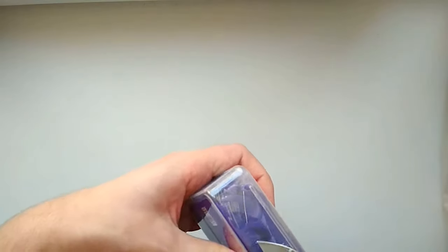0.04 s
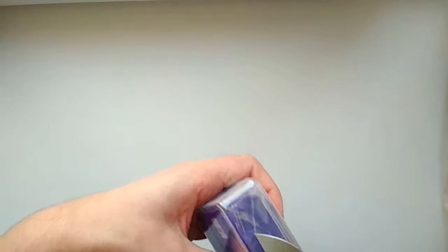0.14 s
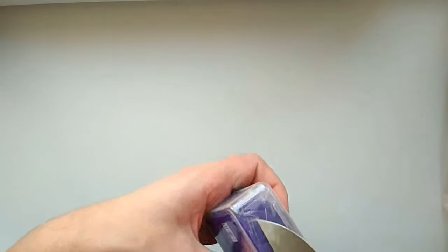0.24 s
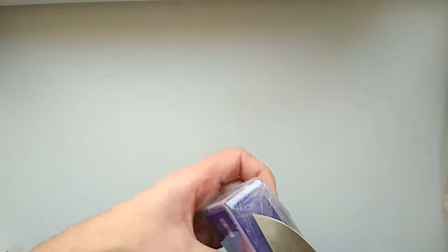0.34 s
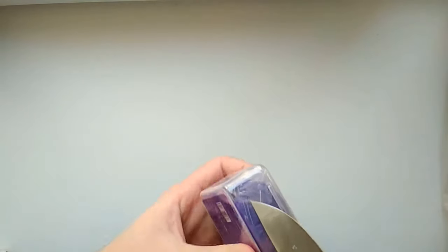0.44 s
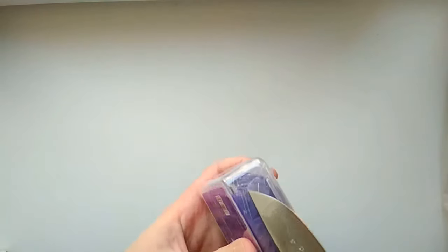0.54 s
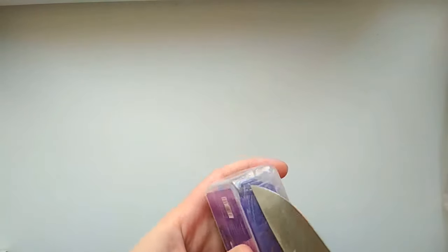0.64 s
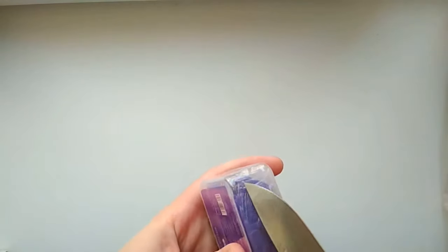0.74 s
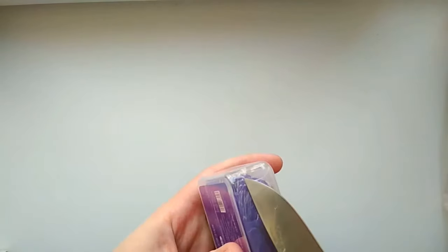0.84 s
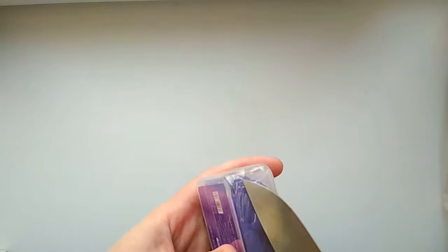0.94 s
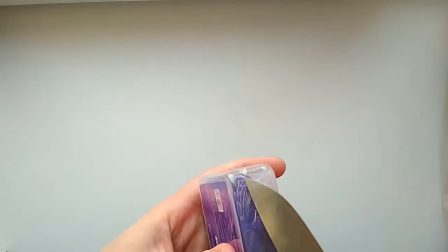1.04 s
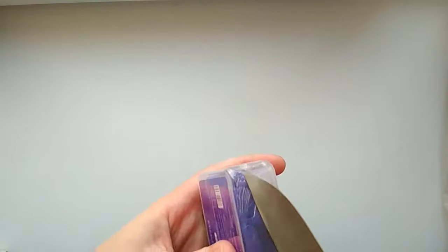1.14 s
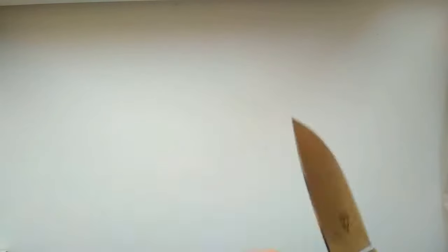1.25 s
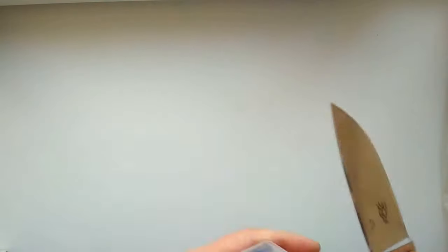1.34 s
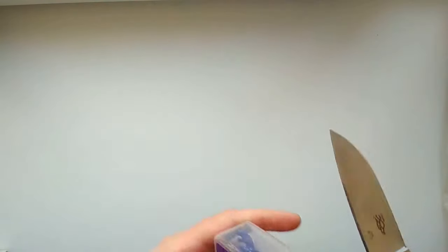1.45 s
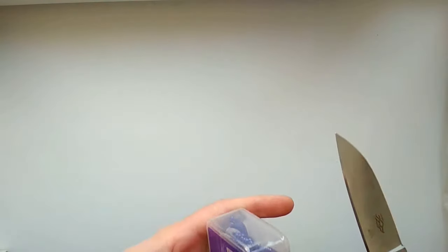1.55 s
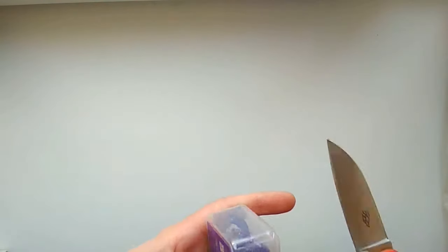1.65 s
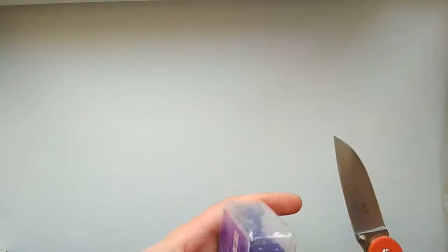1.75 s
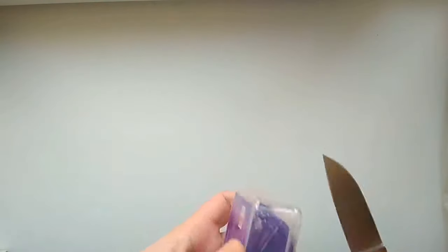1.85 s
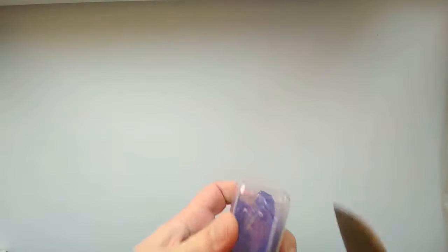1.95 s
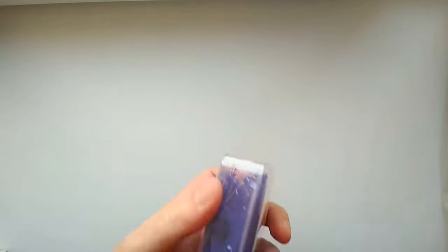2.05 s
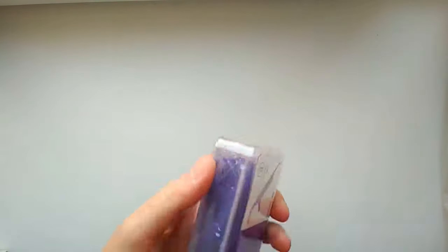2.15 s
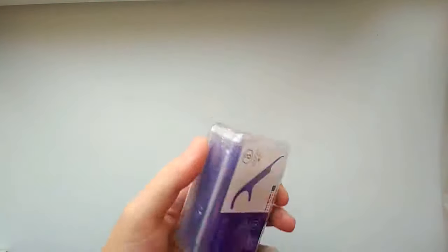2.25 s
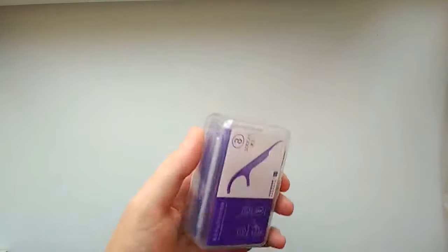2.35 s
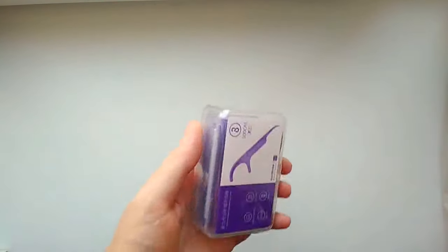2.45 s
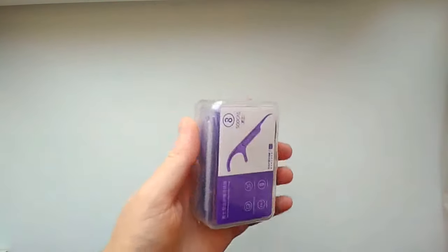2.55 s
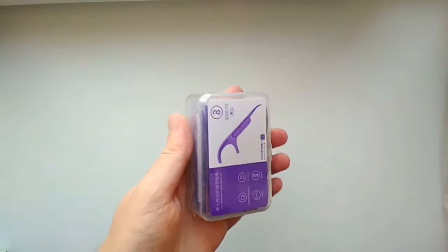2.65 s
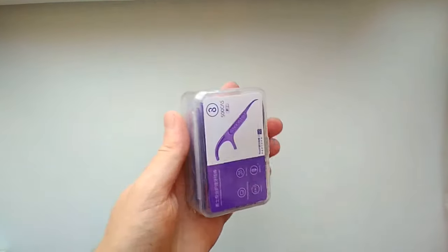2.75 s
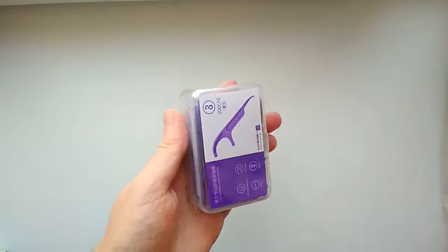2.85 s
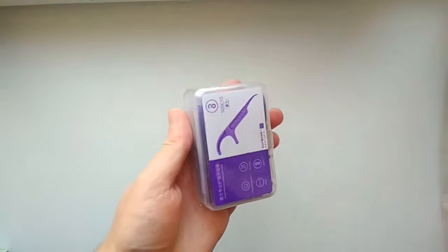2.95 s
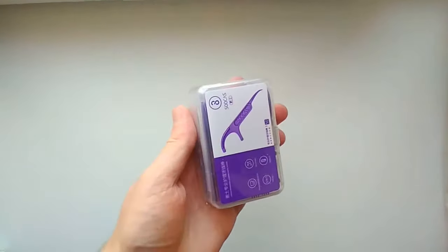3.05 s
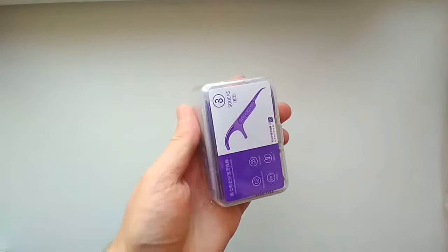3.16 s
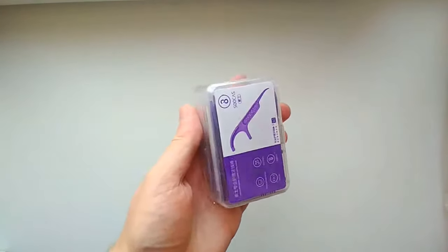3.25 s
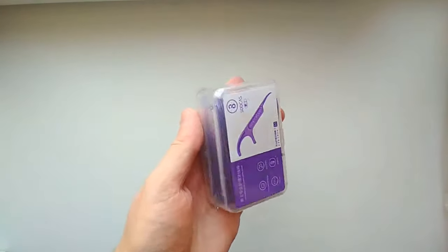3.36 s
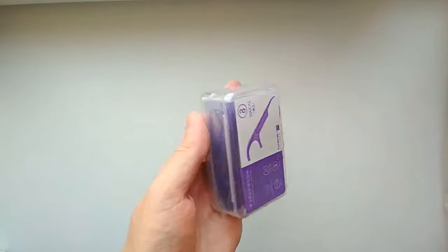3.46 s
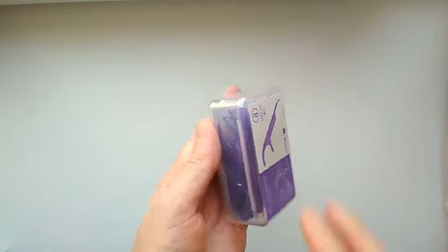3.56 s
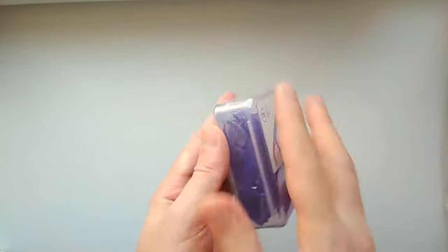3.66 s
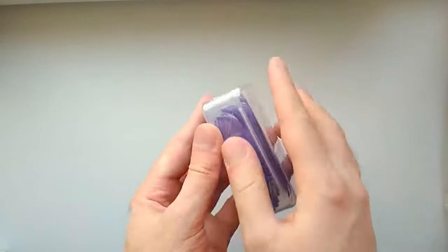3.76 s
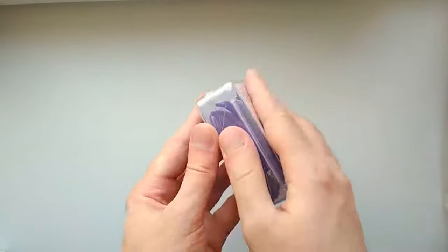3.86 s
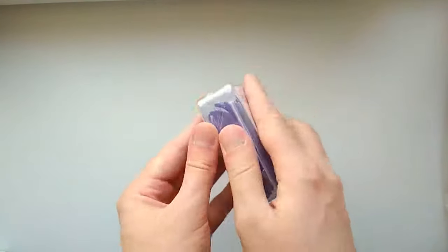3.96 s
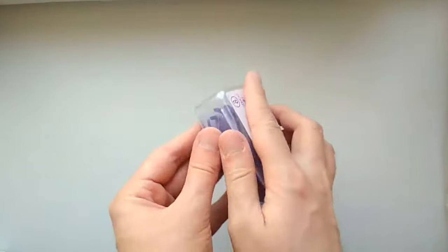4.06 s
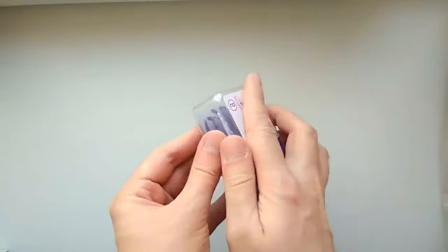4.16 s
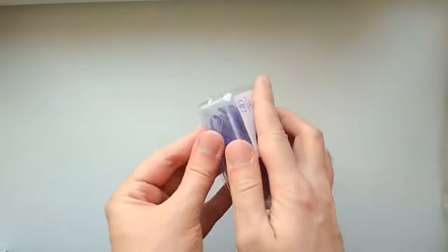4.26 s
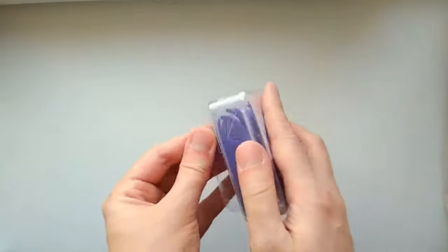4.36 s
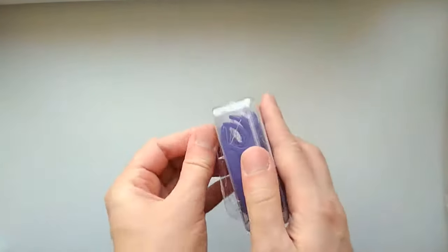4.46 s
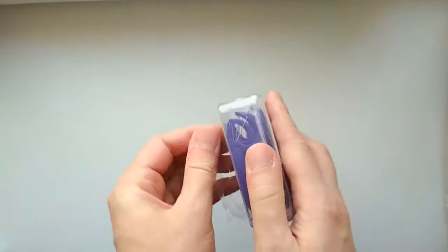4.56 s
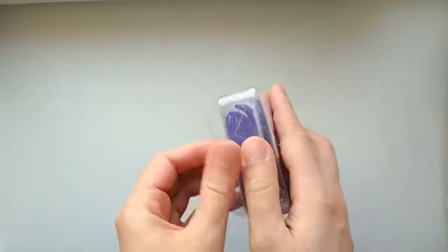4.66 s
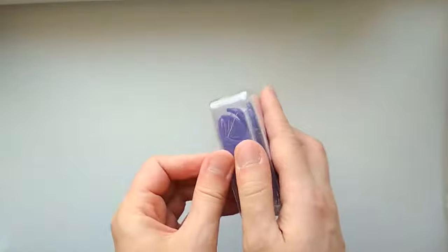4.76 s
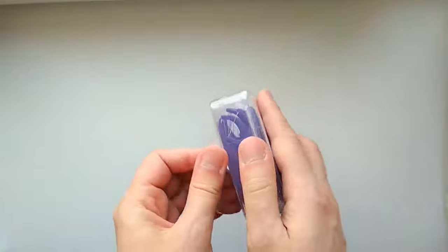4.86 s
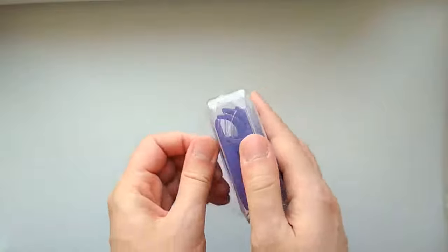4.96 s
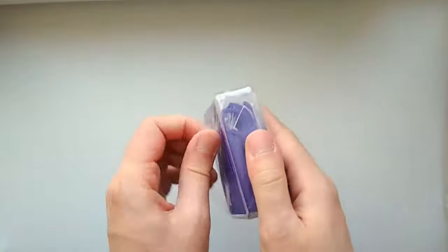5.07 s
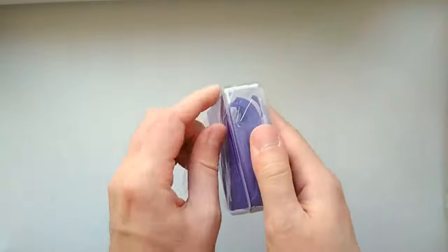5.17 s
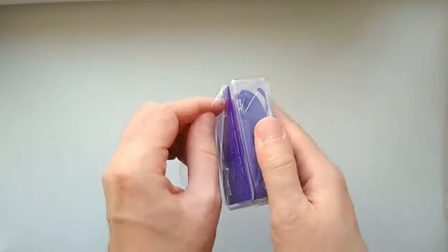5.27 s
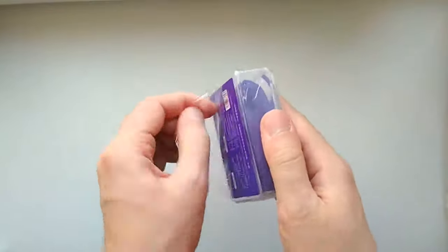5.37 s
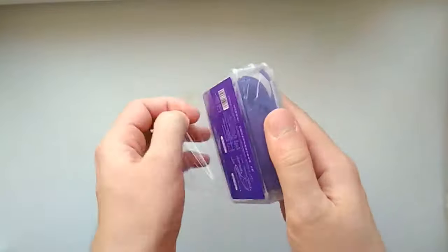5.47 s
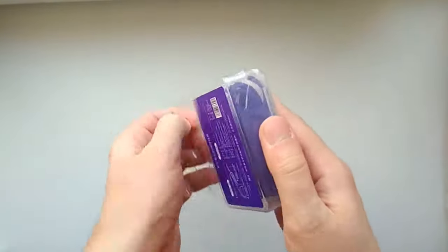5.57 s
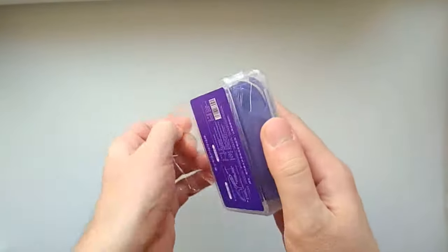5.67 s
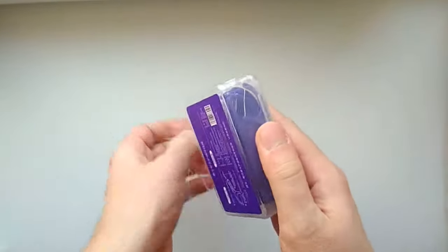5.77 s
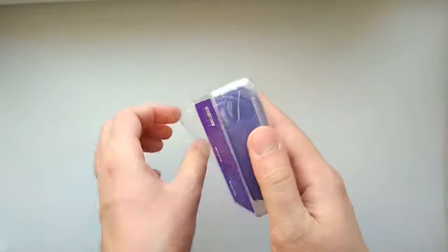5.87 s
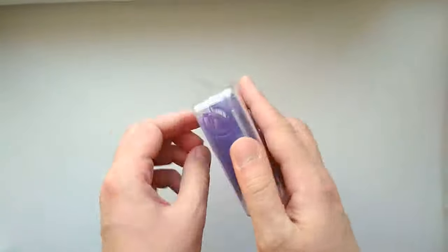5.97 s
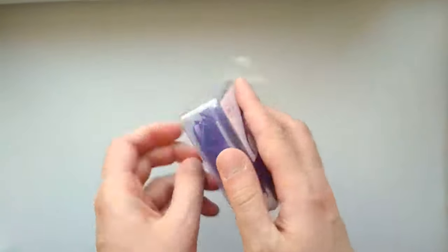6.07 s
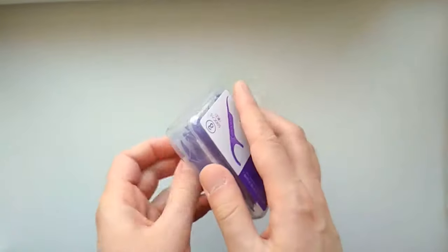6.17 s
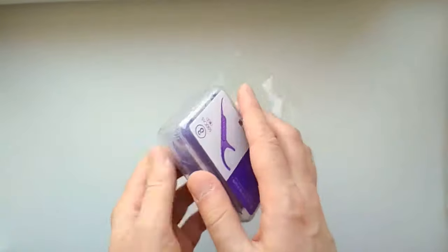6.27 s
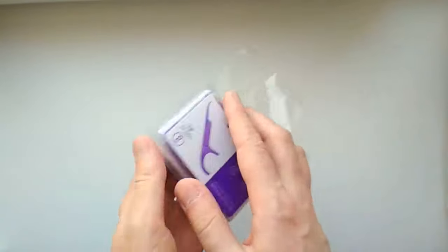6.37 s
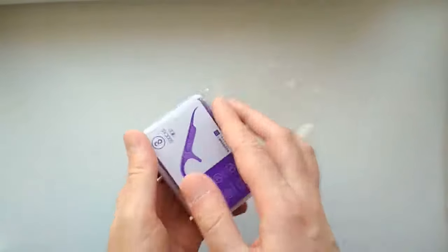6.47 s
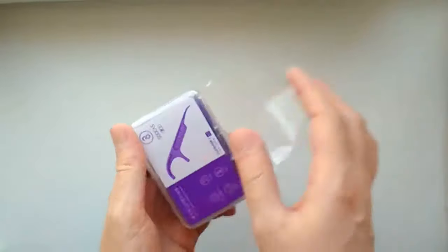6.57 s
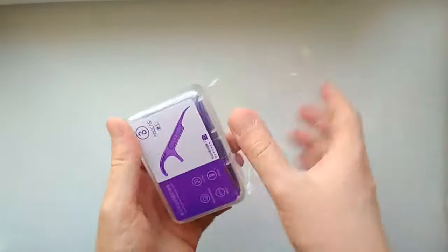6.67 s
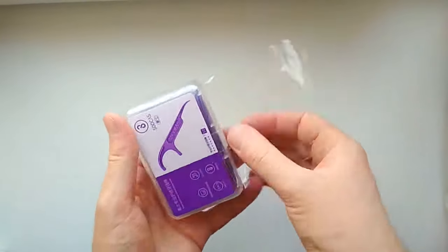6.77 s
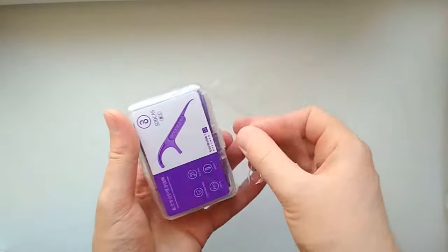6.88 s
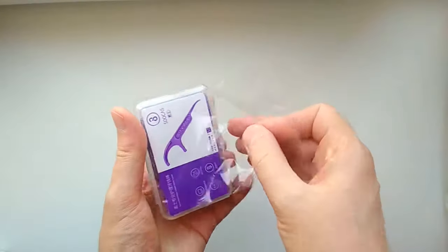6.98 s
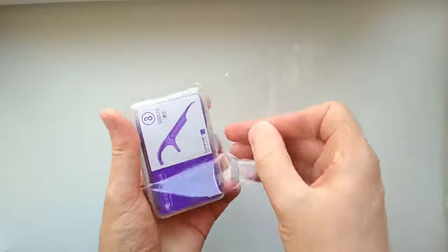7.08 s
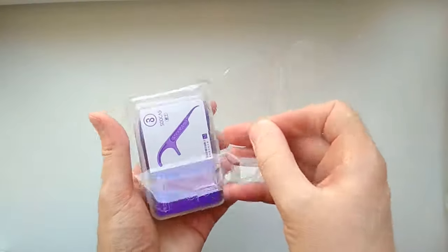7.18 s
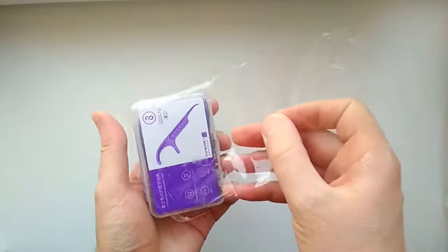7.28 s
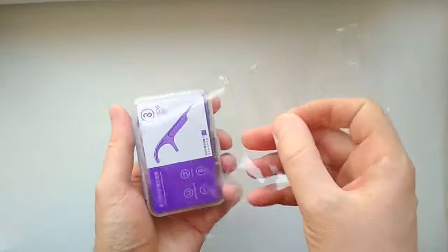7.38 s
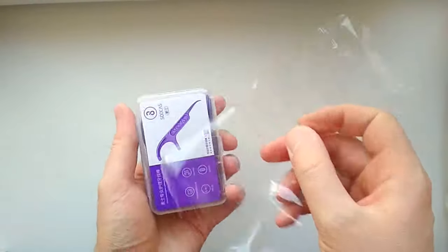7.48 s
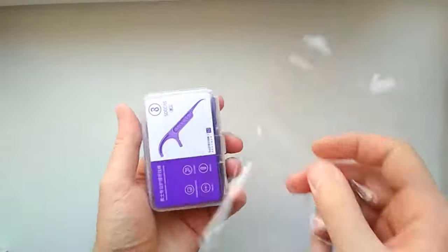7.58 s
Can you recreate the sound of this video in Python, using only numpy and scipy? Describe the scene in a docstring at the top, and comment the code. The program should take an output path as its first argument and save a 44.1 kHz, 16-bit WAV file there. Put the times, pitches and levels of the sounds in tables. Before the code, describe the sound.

A knife pierces plastic film on a small case, which clatters; the knife is set down, then fingers crackle and peel the wrapping away.

```python
"""Thin film wrapped round a small plastic case, slit by a knife, then picked and peeled by fingers, close by.
Film: buckle noise, cracking facets and treble fold resonances, with taps on the hollow case underneath.
The blade slips off and the case clatters (ringing bursts); the knife is laid on the table (low-passed bursts).
Damped sines give the low thumps; the quiet room adds diffuse reflections, low noise and a hum."""
import sys
import numpy as np
from scipy import signal
from scipy.fft import rfft, irfft
from scipy.io import wavfile
from scipy.ndimage import uniform_filter1d

SR = 44100
rng = np.random.default_rng(int(sys.argv[2]) if len(sys.argv) > 2 else 0)


def generate_wav(signal):
    """Clip the signal to [-1, 1] and save it as 16-bit WAV at the path in sys.argv[1]."""
    frames = np.transpose(np.atleast_2d(signal))
    scaled = np.clip(frames, -1, 1) * 32767
    pcm = np.round(scaled).astype(np.int16)
    wavfile.write(sys.argv[1], SR, pcm)


N = 336042


def from_db(db):
    """Decibels to amplitude gain."""
    return 10 ** (np.asarray(db) / 20)


def rms_one(x):
    """Scale to rms 1."""
    return x / np.sqrt(np.mean(x ** 2) + 1e-20)


def at_hz(points, hz):
    """Interpolate a table along a log-frequency axis."""
    table_hz, values = np.transpose(points)
    return np.interp(np.log(np.maximum(hz, 1)), np.log(table_hz), values)


def convolve(x, response):
    """Play a stereo signal through an impulse response."""
    return signal.fftconvolve(x, np.atleast_2d(response), axes=1)[:, :N]


def colour(x, spectrum, size=4096):
    """Causal (minimum-phase) filter that keeps the power of white noise."""
    gain = from_db(at_hz(spectrum, np.fft.rfftfreq(size, 1 / SR)))
    cepstrum = irfft(np.log(gain))
    # fold the cepstrum onto positive time
    cepstrum[1:size // 2] *= 2
    cepstrum[size // 2 + 1:] = 0
    response = irfft(np.exp(rfft(cepstrum)))[:size // 2]
    return convolve(x, response / np.linalg.norm(response))


def resonate(x, hz, width_hz):
    """Two-pole resonance, peak gain 1."""
    r = np.exp(-np.pi * width_hz / SR)
    zeros = np.array([1, 0, -1]) * (1 - r * r) / 2
    poles = [1, -2 * r * np.cos(2 * np.pi * hz / SR), r * r]
    return signal.lfilter(zeros, poles, x + 1e-18)


def resonate_twice(x, hz, width_hz):
    """Two equal resonances in series, for steeper skirts."""
    return resonate(resonate(x, hz, width_hz), hz, width_hz)


def stereo_noise(alike, size=N):
    """White noise whose two channels correlate by alike."""
    alike = np.clip(alike, 0, 1)
    mid, side = rng.standard_normal((2, size))
    sides = np.sqrt(1 - alike) * side * [[1], [-1]]
    return (np.sqrt(1 + alike) * mid + sides) / np.sqrt(2)


def flicker(per_s, spread_db):
    """Gain of rms 1 that glides to a new random value per_s times a second."""
    steps_db = spread_db * np.clip(rng.standard_normal(int(per_s * N / SR)), -2.5, 1.3)
    return rms_one(np.interp(np.arange(N), np.linspace(0, N, len(steps_db)), from_db(steps_db)))


def bursts(rows, alike, size=6000):
    """Each contact (t/s, level/dB, T60/s[, wall f/Hz]) shakes dense modes; a wall resonance is favoured."""
    out, age_s = np.zeros((2, N + size)), np.arange(size) / SR
    for s, db, t60_s, *wall_hz in rows:
        fade = from_db(-60 * age_s / t60_s) * np.minimum(age_s / .0004, 1)
        burst = stereo_noise(alike, size=size) * fade
        burst = burst + sum(from_db(5) * resonate(burst, hz, 450) for hz in wall_hz)
        at = max(int(s * SR), 0)
        out[:, at:at + size] += from_db(db) * rms_one(burst) * np.sqrt(np.mean(fade ** 2))
    return out[:, :N]


# resonances of the table and the corner above it: f/Hz, width/Hz, relative level/dB
TABLE_MODES = [(390.2, 30, 3), (480, 9.9, -2.5), (590, 40, -4), (731, 14, -2), (800, 16, 3), (886, 33, 0.5),
               (1028, 41, -3.5), (1355, 18, -7.5), (1598, 16, -3.5), (1905, 24, -1.5), (2380, 60, -7)]


def hollow(x, modes_db, size=12000):
    """The table and its corner ring along with a sound; the power is kept."""
    click = signal.unit_impulse(size)
    ring = sum(from_db(db) * resonate(click, hz, width_hz) for hz, width_hz, db in TABLE_MODES)
    sound = convolve(x, click + from_db(modes_db) * ring)
    return sound * np.std(x) / np.std(sound)


# room noise colour: f/Hz, relative density/dB
AIR_COLOUR = [(25, -18), (60, -6), (130, -5), (280, -13), (520, -26.5), (860, -30.5), (1300, -42),
              (4500, -86), (13000, -56.5)]
# weaker hum lines: f/Hz, half the width of each of two passes/Hz, relative level/dB
LOW_HUM_LINES = [(71.7, 4, -8), (99.6, 6.3, -18.5), (204, 2.7, -16.5)]
# swell of the weaker lines: t/s, relative level/dB
LOW_HUM_SWELL = [(0.3, -48.5), (1.6, -55), (3.0, -67), (5.8, -68), (6.5, -50), (7.3, -41)]
# swell of the main hum line: t/s, relative level/dB
HUM_SWELL = [(0.1, -58), (1.1, -55.5), (1.4, -52), (2.15, -55), (2.8, -48), (3.4, -55), (4.5, -66),
             (5.6, -61), (6.5, -55.5), (7.3, -50)]
AIR_DB, AIR_SHARE_OF_SWELL = -55.5, 0.097   # before the left/right balance; share of the hum's dB swing


def background():
    """Low noise and a wavering hum, its tone lagging on the right; the noise partly swells with it."""
    t, hum_hz = np.arange(N) / SR, 145.3
    swell_db = np.interp(t, *np.transpose(HUM_SWELL))
    air_db = AIR_DB + AIR_SHARE_OF_SWELL * (swell_db - swell_db.mean())
    air = from_db(air_db) * colour(stereo_noise(.55), AIR_COLOUR)
    lines = 0
    for hz, half_width_hz, db in LOW_HUM_LINES:
        lines = lines + from_db(db) * rms_one(resonate_twice(stereo_noise(.5), hz, 2 * half_width_hz))
    low_swell = from_db(np.interp(t, *np.transpose(LOW_HUM_SWELL)))
    # narrow noise on the steady sine makes the hum waver
    waver = rms_one(resonate_twice(stereo_noise(1.0), hum_hz, 32))
    lag_rad = [[0], [.7]]
    tone = np.sin(2 * np.pi * hum_hz * t - lag_rad) + .3 * waver
    return (air + low_swell * lines) * from_db([[-3.5], [2.4]]) + from_db(swell_db + 4.0) * tone


# a facet cracks, then flutters; its own colour varies by FACET_COLOUR_DB (standard deviation)
CRACK_T60_S, FLUTTER_T60_S, FLUTTER_DB, FACET_COLOUR_DB = .009, .04, -14, 5


def facet(size=1300):
    """One buckling facet: dry crack, faint flutter, broad peaks and dips of its own; rms 1 over 5 ms."""
    age_s = np.arange(size) / SR
    crack = from_db(-60 * age_s / CRACK_T60_S)
    flutter = from_db(FLUTTER_DB - 60 * age_s / FLUTTER_T60_S)
    fade = (crack + flutter) * np.minimum(age_s / .0005, 1)
    own_colour = np.transpose([np.linspace(1500, 16000, 30), FACET_COLOUR_DB * rng.standard_normal(30)])
    sound = colour(stereo_noise(0.1, size=size) * fade, own_colour, size=512)
    sound = sound * from_db(rng.normal(0, 1.5, (2, 1)))   # random balance
    return sound / np.sqrt(np.mean(sound[:, :SR // 200] ** 2))


def facets(rows):
    """Play one new facet for each (t/s, level/dB)."""
    out = np.zeros((2, N + SR))
    for s, db in rows:
        at, sound = max(int(s * SR), 0), facet()
        out[:, at:at + sound.shape[1]] += from_db(db) * sound
    return out[:, :N]


# film colour: f/Hz, relative density/dB
FILM_COLOUR = [(1500, -24), (3500, -17), (5500, -12), (8000, -8), (10500, -6), (13000, -4.5), (15800, -3)]
# colour of the tap under a snap: f/Hz, relative density/dB
SNAP_BODY_COLOUR = [(100, -36.5), (350, 1), (900, -5.5), (2000, -2.5), (3200, -13), (6000, -9.5),
                    (12000, -76)]


def buckles(rows):
    """Each buckle (t/s, tick/dB, relative body/dB) gives a sharp film tick and a tap on the case."""
    tick = facets([(s, tick_db) for s, tick_db, body_db in rows])
    tap = bursts([(s, body_db + 8.5, .016) for s, tick_db, body_db in rows], alike=0.28)
    return colour(tick, FILM_COLOUR) + hollow(colour(tap, SNAP_BODY_COLOUR), modes_db=9.5)


FACETS_PER_S, FACET_SPREAD_DB = 75, 4.5
FACET_DB, FACET_TAP_DB = -2.5, -10   # relative to the film and case drive


def small_snaps(film_gain, case_gain):
    """Strain lets go at uneven intervals: rows (t/s, tick/dB, body/dB) that follow the strokes."""
    count = int(FACETS_PER_S * N / SR)
    at = ((np.arange(count) + rng.random(count)) * (N - 1) / count).astype(int)
    size_db = FACET_SPREAD_DB * np.clip(rng.standard_normal(count), -2, 1.2)
    tick_db = 20 * np.log10(film_gain[at]) + FACET_DB + size_db
    body_db = 20 * np.log10(case_gain[at]) + FACET_TAP_DB + size_db
    return np.transpose([at / SR, tick_db, body_db])


def creases(per_s, spread_db, t60_s):
    """Envelope, of rms 1, of countless tiny buckles: most faint, a few strong."""
    sizes = from_db(spread_db * np.minimum(rng.exponential(1, N), 3))
    energy = (rng.random(N) < per_s / SR) * sizes ** 2
    keep = from_db(-120 / (t60_s * SR))   # amplitude squared, hence twice 60 dB
    energy = uniform_filter1d(energy, size=24) + 1e-9
    return rms_one(np.sqrt(signal.lfilter([1], [1, -keep], energy)))


def shifting_folds(drive):
    """Film folds resonate across the treble, each flickering on its own, so the colour keeps changing."""
    shakes = [stereo_noise(0.055) * drive for _ in range(3)]
    folds = 0
    for k, hz in enumerate(np.linspace(2400, 15600, 16)):
        folds = folds + resonate(shakes[k % 3], hz, 480) * flicker(40, 6)
    return folds * np.std(drive) / np.std(folds)


ATTACK_S = 0.0077


def effort(strokes, grip_s, grip_db, settle_db_per_s):
    """Gain of strokes (t/s, length/s, dB, swell/dB): attack, sloping hold, release, over grip slips."""
    t = np.arange(N) / SR
    slips = flicker(22, 5)
    power = (from_db(np.interp(t, grip_s, grip_db)) * slips) ** 2
    age_s = t[:SR]
    for s, length_s, db, swell_db in strokes:
        hold_db = swell_db * np.minimum(age_s / length_s, 1)
        release_db = settle_db_per_s * np.maximum(age_s - length_s, 0)
        gain = np.minimum(age_s / ATTACK_S, 1) * from_db(db + hold_db - release_db)
        at = max(int(s * SR), 0)
        power[at:at + SR] += gain[:N - at] ** 2
    return np.sqrt(power)


# scrapes, rubs and pulls: t/s, length/s, film drive/dB, case drive/dB, gain from start to end/dB
STROKES = [(0.146, 0.093, -44, -54, -5), (0.378, 0.068, -60.5, -56, 3), (0.545, 0.13, -54, -58.5, -4),
           (1.189, 0.13, -41, -72.5, 0), (1.975, 0.01, -49, -57, 1), (2.321, 0.05, -59.5, -46, -10),
           (3.546, 0.013, -50.5, -76, -0.5), (3.701, 0.011, -40, -35.5, -4),
           (4.143, 0.0096, -35.5, -72, -3.5), (4.336, 0.053, -39, -47, 1), (4.4, 0.024, -29.5, -33, -3),
           (4.591, 0.094, -46, -53.5, 7.5), (4.738, 0.04, -37, -41.5, 1.5), (4.955, 0.016, -33, -46, -1),
           (5.001, 0.0074, -27, -41, -5.5), (5.063, 0.0096, -36, -35.5, -4), (5.123, 0.012, -32, -37.5, 1),
           (5.282, 0.28, -33, -32, -10.5), (5.463, 0.07, -32.5, -39.5, -1.5), (5.553, 0.039, -40.5, -45, 7),
           (5.633, 0.05, -36, -36.5, 6), (5.796, 0.1, -34, -40.5, -1.5), (5.944, 0.095, -31.5, -37, -2.5),
           (6.095, 0.028, -37, -35, -3.5), (6.189, 0.054, -41.5, -44.5, -10.5),
           (6.405, 0.067, -53, -40, -8), (6.485, 0.046, -49.5, -51.5, 2.5), (6.592, 0.019, -45, -47, 9),
           (6.663, 0.066, -41, -56, -7), (6.819, 0.1, -30.5, -33, -4), (6.955, 0.19, -31.5, -34, -3),
           (7.151, 0.094, -44, -81, 4.5), (7.247, 0.0085, -40.5, -53.5, 1.5)]
# faint rustle of the fingers' grip: t/s, film drive/dB, case drive/dB
GRIP = [(0.08, -64.5, -86), (0.8, -63.5, -60.5), (1.15, -68.5, -80.5), (1.5, -64.5, -65),
        (1.68, -75.5, -74), (1.92, -70, -58.5), (2.1, -79, -65), (2.5, -72, -64), (2.62, -96.5, -78.5),
        (3.35, -86, -72), (3.75, -64.5, -76), (4.1, -58.5, -60.5), (4.85, -57, -63), (7.6, -65.5, -59.5)]
# case colour: f/Hz, relative density/dB
CASE_COLOUR = [(80, -4), (230, 0.5), (420, -3), (600, -5), (1200, -7), (2000, -5), (3000, -7.5),
               (8000, -26.5)]
FILM_SETTLE_DB_PER_S, CASE_SETTLE_DB_PER_S = 317.5, 302
GRAIN_DB, CASE_GRAIN_DB = 0.5, -4.5   # relative to the drives


def crinkle():
    """Tiny buckles and larger facets run through the moving film; the case gives a hollow underside."""
    s, length_s, film_db, case_db, swell_db = np.transpose(STROKES)
    grip_s, grip_film_db, grip_case_db = np.transpose(GRIP)
    film_strokes = zip(s, length_s, film_db, swell_db)
    case_strokes = zip(s, length_s, case_db, swell_db)
    film_gain = effort(film_strokes, grip_s, grip_film_db, FILM_SETTLE_DB_PER_S)
    case_gain = effort(case_strokes, grip_s, grip_case_db, CASE_SETTLE_DB_PER_S)
    # the film sticks and gives way, so the buckles clump
    grains = creases(per_s=1000, spread_db=3.2, t60_s=.008) * flicker(80, 3.5)
    fine = shifting_folds(grains * film_gain * from_db(GRAIN_DB))
    case = colour(grains * case_gain * from_db(CASE_GRAIN_DB) * stereo_noise(0.82), CASE_COLOUR)
    # the shifting grip varies how well the film drives the case
    case = hollow(case, modes_db=3) * flicker(33, 1.5)
    return colour(fine, FILM_COLOUR) + case + buckles(small_snaps(film_gain, case_gain))


# single distinct buckles, faint to loud: t/s, bright tick level/dB, relative hollow body level/dB
SNAPS = [(0.1304, -39, -65.5), (0.383, -51, -61), (0.42, -45.5, -53), (0.6455, -37, -77),
         (0.6699, -41, -54.5), (0.818, -43, -48.5), (1.0075, -37.5, -55), (1.199, -26, -38),
         (1.5023, -40, -52.5), (1.7954, -47.5, -42.5), (2.3882, -40, -45), (3.7082, -45.5, -38.5),
         (3.7734, -47, -46), (3.8229, -25.5, -43.5), (3.9036, -52, -44.5), (3.9818, -43.5, -56),
         (4.0228, -32, -48), (4.1572, -39, -62.5), (4.1712, -26, -72), (4.2363, -32.5, -65),
         (4.3366, -31, -48), (4.3757, -23.5, -36.5), (4.391, -25, -47), (4.412, -41, -44.5),
         (4.4225, -35, -36.5), (4.4455, -27, -45.5), (4.5114, -38, -70), (4.6032, -31.5, -58),
         (4.6207, -27.5, -46.5), (4.634, -25, -59), (4.6577, -26, -30.5), (4.7304, -23.5, -54),
         (4.7499, -26.5, -43.5), (4.7698, -31, -40), (4.787, -27.5, -37), (4.8794, -39, -72),
         (4.9087, -34, -73), (4.9643, -31.5, -75), (5.009, -26, -40), (5.0716, -30, -39.5),
         (5.1035, -33, -69), (5.1304, -33.5, -58), (5.2655, -41, -54.5), (5.2797, -32, -48.5),
         (5.2902, -18, -25), (5.3538, -23, -35.5), (5.411, -25, -47), (5.4245, -27, -30),
         (5.4712, -25, -30), (5.5722, -29.5, -43.5), (5.6025, -31, -55.5), (5.6291, -24.5, -45.5),
         (5.655, -25.5, -25.5), (5.677, -40, -31.5), (5.7441, -26.5, -38.5), (5.8486, -24, -30.5),
         (5.9338, -30.5, -43), (5.9735, -29, -30), (6.029, -26.5, -36), (6.0737, -24.5, -46),
         (6.1174, -29.5, -38), (6.1737, -37, -51.5), (6.369, -34.5, -53.5), (6.4001, -25.5, -40.5),
         (6.448, -36, -36.5), (6.6176, -41.5, -55.5), (6.8155, -46, -71), (6.8453, -24.5, -30),
         (6.946, -27, -31.5), (6.9665, -44, -30.5), (7.0445, -30, -35), (7.053, -34, -27),
         (7.0887, -29.5, -44), (7.1401, -33, -38), (7.2715, -24.5, -44.5), (7.281, -31.5, -34),
         (7.3684, -43, -45), (7.4779, -36, -46.5), (7.5483, -34, -48), (7.571, -38, -47)]


def single_snaps():
    """Single distinct buckles of the film, faint to loud, each tapping the case."""
    return buckles(SNAPS)


# dry cracks as the point pierces the film: t/s, level/dB, T60/s
CRACKS = [(0.1391, -16.5, 0.014)]
# crack colour: f/Hz, relative density/dB
CRACK_COLOUR = [(500, -2), (2400, 2.5), (4000, -10), (6000, 3.5), (14000, -3)]


def cracks():
    """Taut plastic gives way with one dry, full-range crack."""
    return colour(bursts(CRACKS, alike=0.39), CRACK_COLOUR)


# low thumps and knocks: blade piercing, case jolted or tugged, table booming under the knife:
# t/s, relative level/dB, f/Hz, T60/s
THUMPS = [(0.14, -27, 204, 0.012), (1.201, -29.5, 146, 0.065), (3.135, -30, 150, 0.11),
          (4.418, -33, 630, 0.054), (5.286, -27, 81, 0.11), (5.352, -23, 620, 0.038),
          (5.424, -24.5, 393, 0.06), (5.4896, -16.5, 349, 0.027), (5.674, -27, 262, 0.047),
          (6.966, -28, 82, 0.11), (6.974, -29, 374, 0.039), (6.994, -25.5, 600, 0.048),
          (7.045, -20.5, 129, 0.03), (7.105, -28, 382, 0.076)]


def thumps():
    """Each low thump or knock is a damped sine, stronger on the right."""
    out, age_s = np.zeros(N + SR), np.arange(SR) / SR
    for s, db, hz, t60_s in THUMPS:
        at = int(s * SR)
        out[at:at + SR] += from_db(db - 60 * age_s / t60_s) * np.sin(2 * np.pi * hz * age_s)
    return out[:N] * from_db([[-2], [1.5]])


# the blade slides on after piercing: t/s, relative level/dB, T60/s
SLIT = [(0.143, -36, 0.12)]
SLIT_HZ, SLIT_PASS_WIDTH_HZ = 7000, 3500


def blade_slit():
    """The steel edge hisses through the film: a fading noise burst in one treble band."""
    hiss = resonate_twice(bursts(SLIT, alike=0.09, size=12000), SLIT_HZ, SLIT_PASS_WIDTH_HZ)
    return hiss * np.sqrt(SR / 2 / SLIT_PASS_WIDTH_HZ)   # make up for the narrow band


# case and contents clattering or tapping: t/s, relative level/dB, T60/s, wall f/Hz
CLATTERS = [(1.2055, -20.5, 0.028, 300), (1.214, -22.5, 0.048, 900), (1.2195, -19.5, 0.046, 1720),
            (1.226, -19, 0.021, 825), (1.281, -26, 0.047, 1680), (1.3005, -17.5, 0.043, 1170),
            (1.311, -23, 0.056, 1500), (1.738, -35.5, 0.033, 1830), (1.773, -42.5, 0.023, 856),
            (1.902, -46, 0.029, 1880), (1.983, -41.5, 0.055, 1950), (1.995, -37, 0.032, 870),
            (2.217, -51, 0.024, 1940), (2.271, -57, 0.014, 1990), (2.333, -27.5, 0.037, 2250),
            (2.388, -41, 0.057, 2320), (5.0275, -21, .007, 1100), (5.684, -28.5, 0.034, 1400)]
# clatter colour: f/Hz, relative density/dB
CLATTER_COLOUR = [(120, -2.5), (520, -6.5), (820, -1), (1700, -1), (2050, -1.5), (2600, -9), (5000, -12.5),
                  (15000, -10)]


def clatter():
    """The jolted case's contents rattle on the walls, each hit exciting its own wall resonance."""
    rattle = colour(bursts(CLATTERS, alike=0.31), CLATTER_COLOUR)
    return from_db(-3.5) * hollow(rattle, modes_db=-4)


# the knife laid on the table: t/s, level before low-pass/dB, contact low-pass f/Hz
KNOCKS = [(3.056, -45, 1210), (3.066, -24.5, 1630), (3.081, -28.5, 1170), (3.096, -18, 7100),
          (3.1, -20, 3100), (3.121, -26.5, 1180)]
# table colour: f/Hz, relative density/dB
TABLE_COLOUR = [(100, 1), (280, 0.5), (480, 5), (1300, 1), (2100, -0.5), (3500, -9.5), (7000, -15),
                (15000, -11.5)]


def knife_on_table():
    """Handle and blade touch down in turn; softer contacts are duller, and the table top rings on."""
    out = 0
    for s, db, soft_hz in KNOCKS:
        low_pass = signal.butter(1, min(soft_hz, SR / 2.2), fs=SR)
        knock = bursts([(s, db, .045)], alike=0.57)
        out = out + signal.lfilter(*low_pass, knock + 1e-18)
    return hollow(colour(out, TABLE_COLOUR), modes_db=4)


# room decay: f/Hz, T60/s
ROOM_T60 = [(200, 0.24), (1000, 0.22), (5000, 0.25), (15000, 0.11)]


def room(x, wet_db, size=20000):
    """Diffuse reflections that start 4 ms late, with a decay time for each band."""
    age_s, edges_hz, tail = np.arange(size) / SR, np.geomspace(70, 18000, 9), 0
    for low_hz, high_hz in zip(edges_hz, edges_hz[1:]):
        band_pass = signal.butter(2, [low_hz, high_hz], "band", fs=SR, output="sos")
        band = signal.sosfilt(band_pass, stereo_noise(0.15, size=size))
        t60_s = at_hz(ROOM_T60, np.sqrt(low_hz * high_hz))
        tail = tail + band * from_db(-60 * age_s / t60_s)
    tail = rms_one(tail * (age_s > .004)) / np.sqrt(size)
    return x + from_db(wet_db) * convolve(x, tail)


def scene():
    """The film is close, louder and 4 samples earlier on the right; the knocks stir the room more."""
    film = crinkle() + single_snaps() + blade_slit() + cracks()
    left, right = film * from_db([[-1.2], [.8]])
    late_left = np.pad(left, (4, 0))[:N]
    film = room(np.array([late_left, right]), wet_db=-15)
    knocks = room(clatter() + knife_on_table() + thumps(), wet_db=-7)
    return film + knocks + background()


# microphone port resonances, left then right: f/Hz, width/Hz, level added to the direct sound/dB
PORTS = [(12950, 5600, -0.5), (11170, 1800, 8)]
CUTOFF_HZ = 15900


def record(dry):
    """Each microphone port lifts its own part of the treble; a steep low-pass cuts the top."""
    heard = []
    for x, (hz, width_hz, db) in zip(dry, PORTS):
        heard.append(x + from_db(db) * resonate(x, hz, width_hz))
    low_pass = signal.ellip(10, .3, 70, CUTOFF_HZ, fs=SR, output="sos")
    return signal.sosfilt(low_pass, np.array(heard))


dry = scene()
out = record(dry)
generate_wav(out)
```